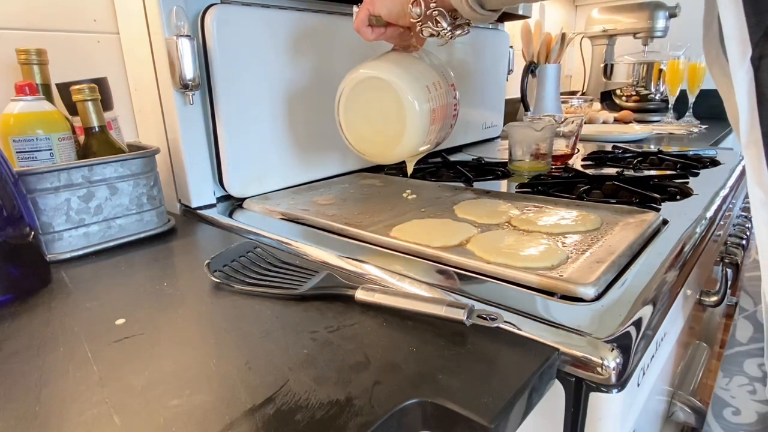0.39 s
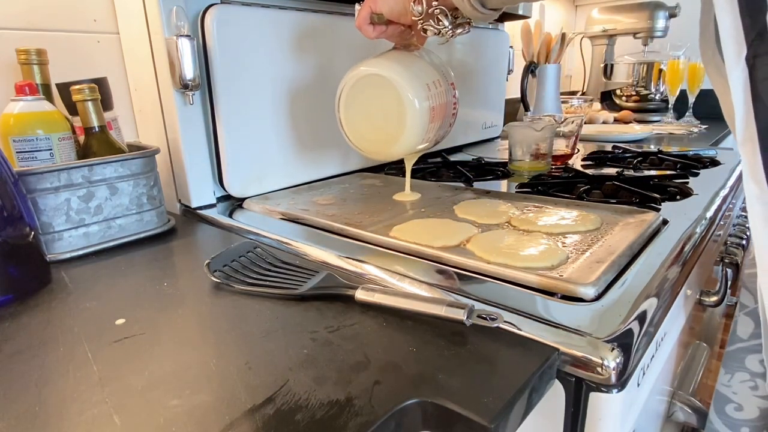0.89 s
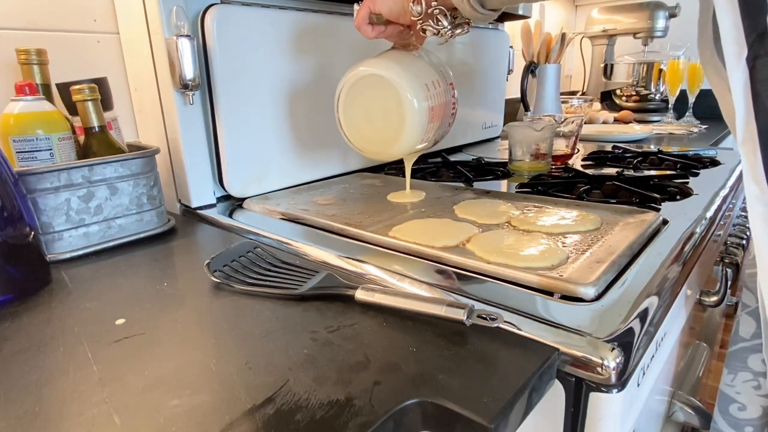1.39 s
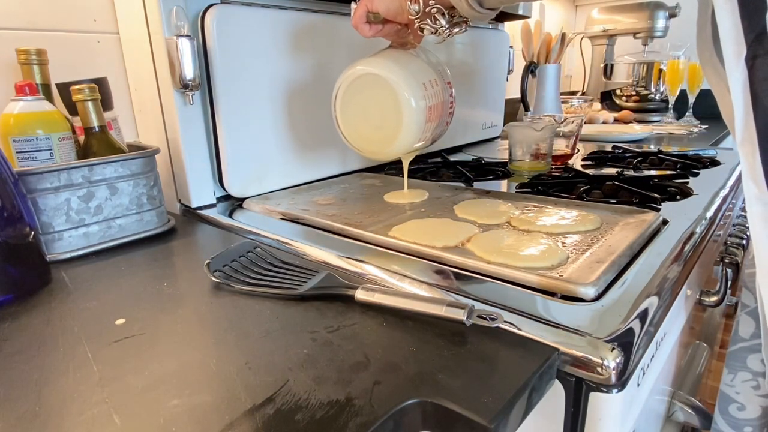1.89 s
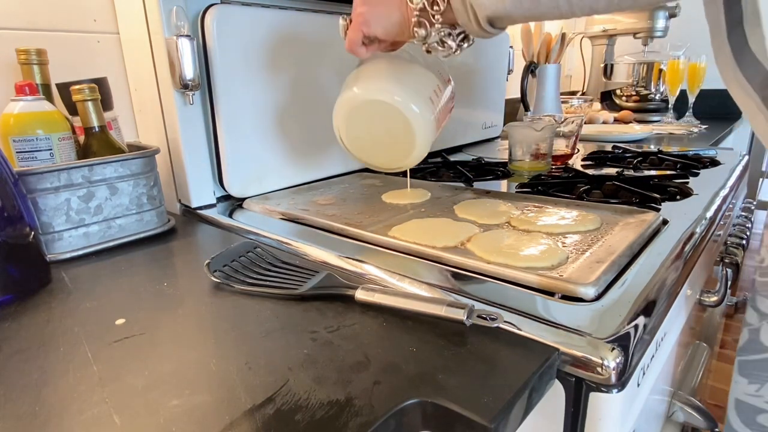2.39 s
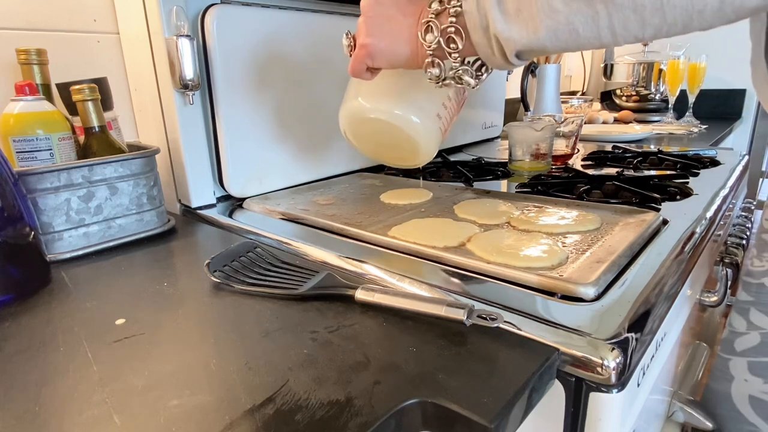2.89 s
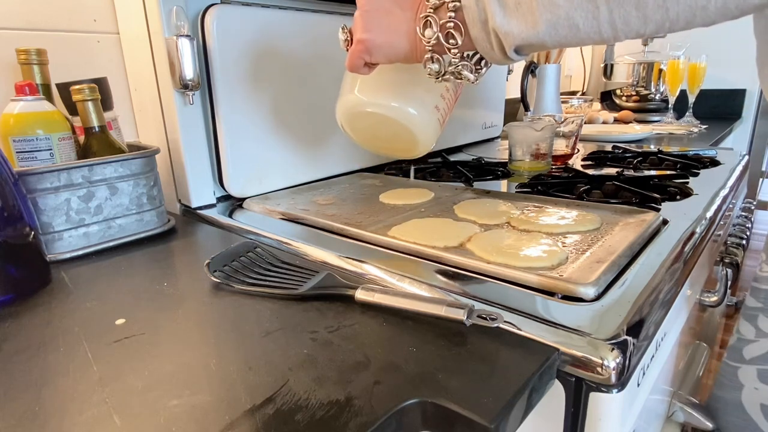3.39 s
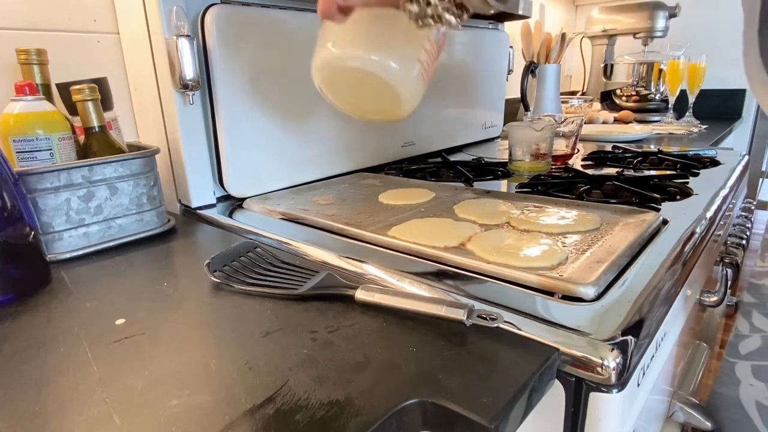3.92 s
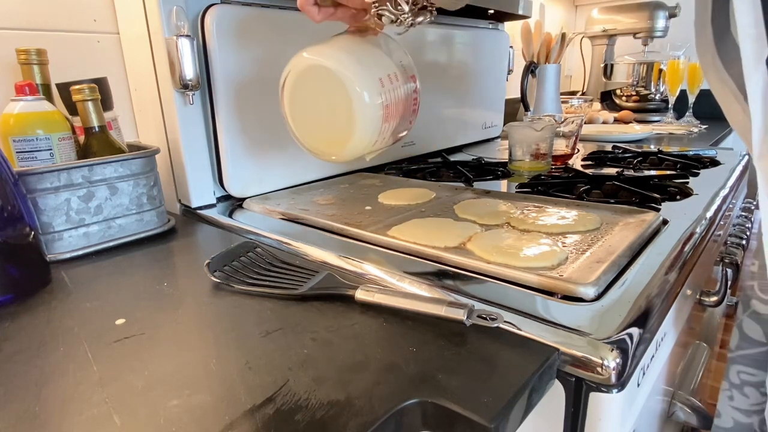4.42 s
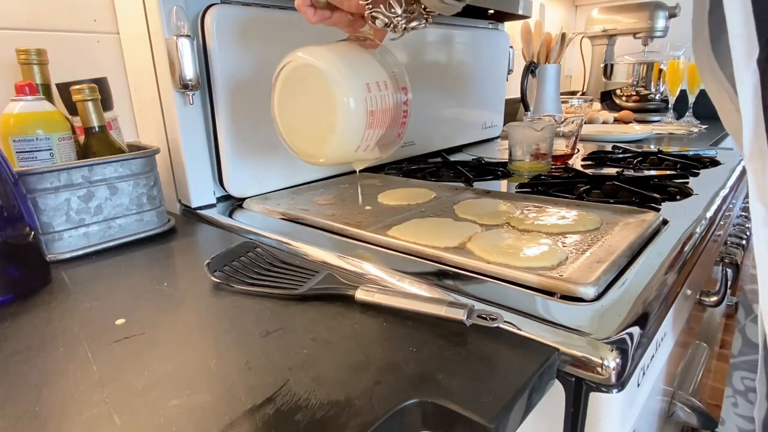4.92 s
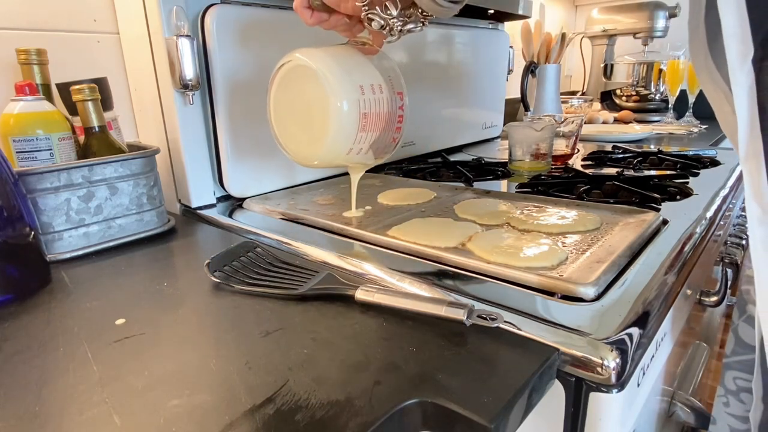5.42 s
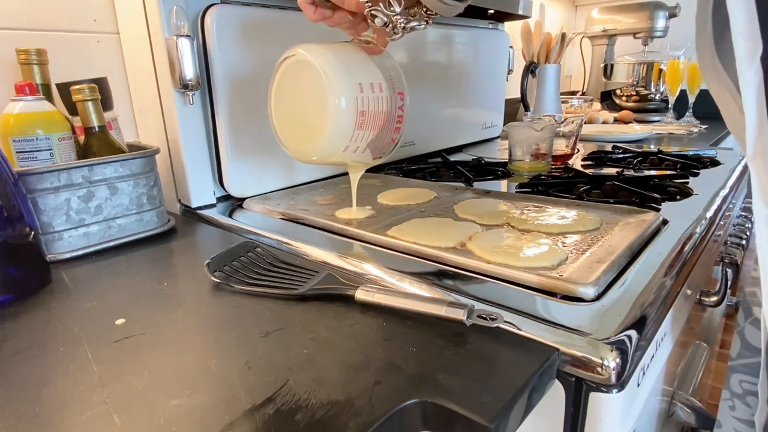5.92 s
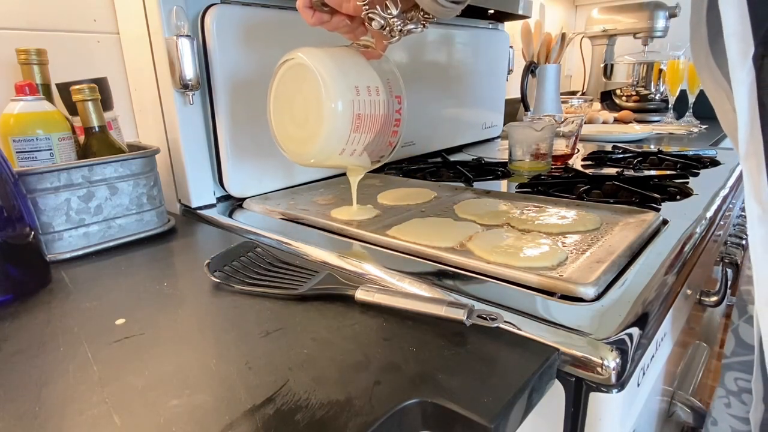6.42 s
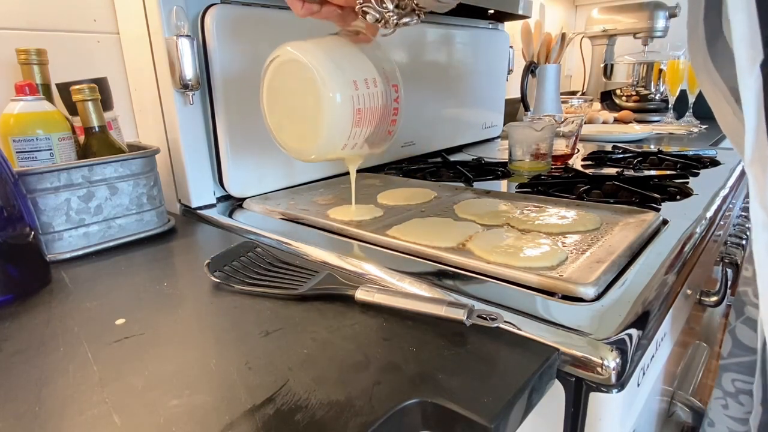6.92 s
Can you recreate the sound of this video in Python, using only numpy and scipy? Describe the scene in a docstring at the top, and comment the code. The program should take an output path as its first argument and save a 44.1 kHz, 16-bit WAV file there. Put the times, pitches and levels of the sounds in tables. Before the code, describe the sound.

A low, soft kitchen fan hum wavers throughout over a rush of air, beneath faint frying from earlier pancakes. In the first half second, tiny fat ticks and drips of batter make short sizzling bursts at about 0.25 and 0.35, with a faint plate ring. At 0.5 the first stream lands and the sizzle quickly swells to a dense, bright hiss with midrange bubbling beneath. It stays full until about 2.6, then fades gradually, thinning further around 4.5, while small sharp fat spits crackle, clustering between 3.7 and 4.5. Brief drip sizzles flare at 4.8 and 5.2, with tiny metallic tones. At 5.3 the second pour begins, slightly quieter but coarser and more spattery at first, dipping briefly near 6, then smoothing and easing into steady hiss until about 7. Close stereo pickup, wide and crisp, with little room echo.

```python
"""Batter sizzles as it is poured twice onto a hot greased griddle, heard by a pair of microphone ports.
Steam bubbles burst as thousands of random clicks, coloured by bubble size and by the ringing plate.
Fat spits in short cracks of noise, and the plate rings in brief soft tones near landing batter.
Behind them a kitchen fan hums: wavering tones over a rush of noise."""
import sys
import numpy as np
from scipy import signal
from scipy.fft import rfft, irfft, next_fast_len
from scipy.io import wavfile
from scipy.ndimage import uniform_filter1d

SR = 44100
rng = np.random.default_rng(int(sys.argv[2]) if len(sys.argv) > 2 else 0)


def int16_out(signal):
    """Quantize to a 16-bit WAV file."""
    q = np.round(np.clip(np.atleast_2d(signal).T, -1, 1) * 32767)
    wavfile.write(sys.argv[1], SR, q.astype(np.int16))


def attenuation_scalar(level_db):
    """Turn a level in dB into a linear amplitude multiplier (20 dB per decade)."""
    decades = np.asarray(level_db, float) / 20
    return 10 ** decades


N = 311346  # length [samples]
PADDED = next_fast_len(N, real=True)
HZ = np.fft.rfftfreq(PADDED, 1 / SR)
SIDE = np.array([[0.5], [-0.5]])  # splits a left-minus-right difference between the channels


def evened(x):
    """Scales to rms 1."""
    return x / np.sqrt(np.mean(x ** 2) + 1e-20)


def read(points, column=1):
    """Reads a spectrum table on a log-frequency axis."""
    rows = np.transpose(points)
    return np.interp(np.log(HZ + 1), np.log(rows[0] + 1), rows[column])


def bell(hz, width):
    """Resonance curve: 1 at its centre, one half at width / 2 to either side."""
    return 1 / (1 + ((HZ - hz) / (width / 2)) ** 2)


def hump(t, centre, length):
    """Smooth rise and fall around one moment, down to 1/e half a length away."""
    return np.exp(-(2 * (t - centre) / length) ** 2)


def wander(seconds):
    """Slow random drift of rms 1: noise smoothed twice over the given time."""
    span = max(round(seconds * SR), 1)
    once = uniform_filter1d(rng.standard_normal(N), span)
    return evened(uniform_filter1d(once, span))


def patchy(x, patch_db, ring_db):
    """Strengthens and weakens broad patches and narrow brief rings of the spectrum at random."""
    z = signal.stft(x, nperseg=1024, noverlap=768)[2]

    def drift(bins, frames):
        """Random map of rms 1, smoothed over frequency and time."""
        grain = rng.standard_normal(z.shape[1:])
        return evened(uniform_filter1d(uniform_filter1d(grain, bins, axis=0), frames, axis=1))

    gain_db = patch_db * drift(bins=14, frames=30) + ring_db * drift(bins=2, frames=16)
    return signal.istft(z * attenuation_scalar(gain_db), nperseg=1024, noverlap=768)[1][:, :N]


# likeness of the two channels by frequency:
# (frequency [Hz], power share common to both [0-1], phase by which right leads [rad])
CHANNEL_LIKENESS = [(30, 0.7, 1), (60, 0.43, 0.8), (253, 0.6, -0.9), (400, 0.4, -0.2), (520, 0.67, -1),
                    (610, 0.35, -1.2), (700, 0.08, 1.5), (800, 0.16, 0.5), (903, 0.5, -1),
                    (1020, 0.85, -1.77), (1100, 0.9, -1.67), (1166, 0.75, -1.7), (1260, 0.25, -1.3),
                    (1370, 0.6, -0.8), (1590, 0.2, 0.1), (1740, 0.45, 0.4), (1890, 0.5, -2),
                    (2110, 0.5, -0.8), (2250, 0.48, -1.5), (2500, 0.5, -1), (2790, 0.56, -1.54),
                    (2950, 0.58, -2.9), (3270, 0.49, -2.5), (3560, 0.4, -3), (4000, 0.12, 0),
                    (4880, 0.1, -2), (5050, 0.45, -4), (5430, 0.44, -5), (6840, 0.6, -7), (7500, 0.08, -12),
                    (7870, 0.1, -9.5), (8560, 0.46, -8), (9790, 0.3, -7), (9630, 1, -6.5),
                    (10300, 0.86, -6.0), (11200, 0.6, -4.5), (11850, 1, -3), (12540, 1, -2.5),
                    (12970, 0.8, -2), (13600, 1, 0), (15050, .7, 1.5), (15330, .94, 3.05), (16000, 1, 1)]
# nearby walls favour one port or the other: (frequency [Hz], left minus right [dB])
WALL_LEAN = [(200, -1), (400, -1.5), (620, 2), (760, -0.5), (940, -2.5), (1080, 2), (1200, -1.5), (1350, 4),
             (1520, -1.5), (1900, -3), (2100, -0.5), (2400, -1), (2800, -2), (3300, 1), (4500, 0),
             (6800, 0), (8400, 1), (9300, -0.5), (10000, -0.5)]
# the second puddle lies further along the plate: (frequency [Hz], extra phase by which right leads [rad])
SECOND_PUDDLE_LEAD = [(600, 0.8), (850, -0.4), (1050, -0.15), (1160, -0.95), (1290, -3), (1400, 1.1),
                      (1560, 1), (1730, 2.1), (1900, 0.1), (2070, -1.2), (2500, -.7), (2930, 0.9),
                      (3100, -0.1), (3450, 0.45), (4000, 0.061)]


def ports(common, left, right, colour, reach=1, moved=0):
    """Both channels share one sound, right leading in phase; the rest of each channel is its own."""
    share = np.clip(read(CHANNEL_LIKENESS), 0, 1) * reach
    lead = read(CHANNEL_LIKENESS, column=2) + moved * read(SECOND_PUDDLE_LEAD)
    shared = np.exp(-1j * lead * SIDE) * rfft(common, PADDED)
    own = rfft(np.array([left, right]), PADDED, axis=1)
    mixed = np.sqrt(share) * shared + np.sqrt(1 - share) * own
    return irfft(mixed * colour * attenuation_scalar(read(WALL_LEAN) * SIDE), PADDED, axis=1)[:, :N]


# wavering fan tones: (frequency [Hz], typical rms level [dB], rms pitch drift [Hz])
FAN_TONES = [(76.2, -82, 2.47), (114.5, -75.5, 1.8), (155.1, -76.5, 1.8), (238, -84.5, 4.98),
             (259, -87.5, 5.13), (386.5, -84.5, 5.95)]
# colour of the moving air: (frequency [Hz], relative level [dB per Hz])
AIR_COLOUR = [(20, -55), (30, -45), (38, -8), (50, 3), (100, 1), (250, 1), (310, -3), (500, -5.5),
              (900, -9), (2000, -7), (3300, -4), (8000, -12.5), (14000, -28)]


def fan():
    """Narrow wavering tones, the same at both ports, over a low rush of air."""
    common_reach = bell(0, 2 * 900)  # halves the common share by 900 Hz, so the treble is wider
    air = ports(*rng.standard_normal((3, N)), attenuation_scalar(read(AIR_COLOUR)), reach=common_reach)
    air = attenuation_scalar(-63 + 2.3 * wander(0.06)) * evened(patchy(air, patch_db=1.0, ring_db=0.68))
    t = np.arange(N) / SR
    hum = np.zeros(N)
    for hz, db, drift_hz in FAN_TONES:
        drift_cycles = np.cumsum(drift_hz * wander(0.0997)) / SR
        tone = np.sqrt(2) * np.sin(2 * np.pi * (hz * t + drift_cycles))
        hum += attenuation_scalar(db + 3.0 * wander(0.037)) * tone
    return air + hum


# short plate rings near landing batter:
# (time of peak [s], pitch [Hz], peak level midway between channels [dB], length [s], left minus right [dB])
PLATE_RINGS = [(0.37, 2080, -57, 0.076, -7), (5.272, 1960, -56, 0.066, -12), (5.276, 2400, -60, 0.075, -3),
               (5.52, 1690, -55, 0.075, 3)]


def plate_rings():
    """The plate rings near landing batter: a brief soft tone that swells and fades."""
    t, out = np.arange(N) / SR, np.zeros((2, N))
    for s, hz, db, length, lean_db in PLATE_RINGS:
        tone = hump(t, s, length) * np.sin(2 * np.pi * hz * t)
        out += attenuation_scalar(db + lean_db * SIDE) * tone
    return out


# single spits of fat: (time [s], relative peak level before colouring [dB])
FAT_SPITS = [(0.012, -38), (0.025, -39), (0.04, -38), (0.055, -42), (0.0688, -36), (0.1007, -43),
             (0.134, -44), (0.1431, -39), (0.2194, -43), (0.232, -36), (0.2468, -36), (0.263, -40),
             (0.3386, -38), (0.483, -29), (1.5174, -32), (1.6974, -28), (1.973, -25), (2.845, -31),
             (2.878, -26), (3.049, -31), (3.69, -32), (3.819, -33), (3.893, -33), (3.906, -33),
             (3.9535, -29), (4.081, -30), (4.099, -31), (4.156, -32), (4.1833, -31), (4.205, -32),
             (4.334, -31), (4.3094, -33), (4.4463, -27.5), (4.6644, -34), (4.8194, -36), (5.065, -35),
             (6.4785, -26.5)]


def spits():
    """Each spit is a bright crack of noise with a sharp first decay and a weaker tail of milliseconds."""
    length = 400  # samples
    t, common = np.arange(length) / SR, np.zeros(N + length)
    decay = np.exp(-t / 0.00058) + 0.23 * np.exp(-t / 0.0047)
    for s, db in FAT_SPITS:
        crack = rng.standard_normal(length) * decay
        common[round(s * SR):][:length] += attenuation_scalar(db) * crack / abs(crack).max() * 1.8
    common = common[:N]
    silence = np.zeros(N)  # neither channel has a part of its own
    colour = attenuation_scalar(read(FIZZ_COLOUR)) + 0.65 * attenuation_scalar(read(HISS_COLOUR))
    return ports(common, silence, silence, colour)


# streams of batter: (lands [s], stops [s], middle of rim drying [s], steam reference level [dB],
# coarseness before its share [dB])
BATTER_POURS = [(0.5, 2.62, 4.51, -44.5, -1), (5.31, 7.7, 6.87, -47.5, 5)]
# single blobs that land or flare: (time [s], steam reference level [dB], rise [s], fade [dB per s],
# coarseness before its share [dB])
BATTER_BLOBS = [(0.005, -59.5, 0.0046, 35, 3.5), (0.245, -52.5, 0.002, 57, -5.5),
                (0.326, -51, 0.013, 28, -4), (0.345, -47, 0.026, 12, 0), (4.797, -48, 0.025, 112, -5),
                (4.885, -58, .01, 150, -2), (5.02, -57, .015, 100, -2), (5.218, -48, 0.013, 12, 4),
                (5.65, -53, .02, 43, -1)]
# brief dips of the whole sizzle, a negative depth being a swell: (time [s], depth [dB], length [s])
SIZZLE_LULLS = [(0.205, 4, 0.037), (0.24, 4, 0.012), (4.605, 1, 0.072), (5.15, -0.6, .12),
                (5.886, 1.5, 0.025), (5.98, 2, 0.051)]
# The next tables give one value per bubble size: (gurgle, boil, hiss, fizz, spatter, crackle).
# older pancakes, always there: level [dB] of each
OLD_PANCAKES_DB = (-69, -68.5, -61.5, -59, -75, -72)
# offset from the steam reference level, for pours and for blobs: [dB] of each
POUR_OFFSET_DB = (-14, -7, 0.24, 0.37, -16.5, -19)
BLOB_OFFSET_DB = (-20, -16.5, 0.6, 0, -8.5, -16)
# growth time as the puddle spreads: [s] of each
SPREAD_S = (0.43, 0.1, 0.074, .12, 0.037, .3)
# loss from landing on, and further loss once the stream stops; negative grows: [dB per s] of each
SAG_RATE = (0.11, 0.96, 0.45, 0.07, 5, -3)
SET_RATE = (5, 1.6, 0.49, 1.03, 3, 2.9)
# step down as the rim dries: [dB] of each
RIM_DRY_DB = (0.26, 0.57, 2.5, 2.9, 0.98, 2.5)
# coarse boiling favours large bubbles over fine ones: share of coarseness [dB per dB] of each
COARSENESS_SHARE = (0.7, 0.89, -0.098, -0.49, 1.1, -0.3)


def steam(size):
    """Level of one bubble size: the powers of resting pancakes, streams and blobs add up."""
    t = np.arange(0, N, 32) / SR
    power = np.full(len(t), attenuation_scalar(OLD_PANCAKES_DB[size]) ** 2)
    for lands, stops, dries, db, coarse_db in BATTER_POURS:
        age = np.maximum(t - lands, 0)
        loss_db = SAG_RATE[size] * age
        loss_db = loss_db + SET_RATE[size] * np.maximum(t - stops, 0)
        loss_db = loss_db + RIM_DRY_DB[size] * (1 + np.tanh((t - dries) / 0.19)) / 2
        start_db = db + POUR_OFFSET_DB[size] + COARSENESS_SHARE[size] * coarse_db
        growth = 1 - np.exp(-age / SPREAD_S[size])
        power += (attenuation_scalar(start_db - loss_db) * growth) ** 2
    for s, db, rise, fade_db, coarse_db in BATTER_BLOBS:
        age = np.maximum(t - s, 0)
        start_db = db + BLOB_OFFSET_DB[size] + COARSENESS_SHARE[size] * coarse_db
        power += (attenuation_scalar(start_db - fade_db * age) * np.minimum(age / rise, 1)) ** 2
    lull_db = sum(db * hump(t, s, length) for s, db, length in SIZZLE_LULLS)
    return np.interp(np.arange(N) / SR, t, np.sqrt(power) * attenuation_scalar(-lull_db))


def bursts(per_s, spread_db, surge):
    """Three rows of clicks at random moments, most small and a few large, coming in surges."""
    size_db = spread_db * np.minimum(rng.exponential(1, (3, N)), 4)
    clicks = attenuation_scalar(size_db) * rng.standard_normal((3, N))
    clicks = clicks * (rng.random((3, N)) < per_s / SR)
    return np.array([evened(row) * surge for row in clicks])


# colour of each bubble size, from large to fine: (frequency [Hz], relative level [dB per Hz])
GURGLE_COLOUR = [(250, -24), (400, -9.5), (550, -6.5), (650, -7.5), (800, -2.5), (950, 1.5), (1200, -13),
                 (2000, -37)]
BOIL_COLOUR = [(600, -22), (950, -7), (1040, -2.5), (1100, 0), (1350, -2), (1550, 0), (1720, -1),
               (1850, -4), (2200, -4), (2600, -6), (3600, -4.5), (5500, -62)]
HISS_COLOUR = [(1200, -25.5), (2200, -5.5), (3100, -4.5), (3700, -2), (4300, -1.5), (5000, -0.5),
               (6300, -1.5), (7300, -3), (8200, -5.5), (9500, -5), (12000, -16)]
FIZZ_COLOUR = [(6000, -22.5), (8200, -8), (9200, -1.5), (10500, 1.5), (11600, 2), (12300, -1.5),
               (13100, -0.5), (14000, 0), (15000, 0.5), (16000, -14)]
# mid-sized bubbles under a small fresh puddle: (frequency [Hz], relative level [dB per Hz])
SPATTER_COLOUR = [(900, -25), (1150, -6), (1280, 1), (1650, -1.5), (2000, -5), (2500, -0.5), (2900, -15),
                  (4000, -30)]
# griddle plate resonances:
# (frequency [Hz], width [Hz], boost before the ringing factor [dB], left minus right before it [dB])
PLATE_MODES = [(500, 40, 3, -2), (535, 40, 2, 1), (678, 25, 4, 3), (775, 45, 4, 2), (930, 60, 2, -1),
               (1086, 45, 6, 0), (1160, 55, 4, 3), (1265, 55, 4, 5), (1430, 40, 1, 3), (1635, 20, 2, 3),
               (1688, 30, 5, 3), (1964, 25, 5, -3), (2010, 30, 2, 4), (2080, 40, 2, -1), (2449, 50, 2.5, 0),
               (3280, 80, 1.5, 1), (3430, 40, 1.5, -2), (3950, 120, 1.5, -1), (4590, 100, 2, -1),
               (5080, 150, 1.5, 2), (6300, 200, 1, 0)]
# how strongly the plate rings: (factor on dB under first puddle, factor on dB under second puddle)
PLATE_RINGING = (1, 1.11)


def sizzle():
    """Five sizes of bursting bubble and stray pops, all surging together a little and each on its own."""
    common_db = 0.5 * wander(0.02) + 0.43 * wander(0.0045) + 0.55 * wander(0.0014)
    plate = attenuation_scalar(sum((db + lean_db * SIDE) * bell(hz, width) for hz, width, db, lean_db in PLATE_MODES))
    second = np.arange(N) > 5.21 * SR  # from 5.21 s the bubbles burst at the second puddle

    def layer(colour, per_s, spread_db, common, own_db, patch_db, ring_db):
        """One bubble size: clicks coloured by the bubble and the plate, at the place of each puddle."""
        surge = attenuation_scalar(common * common_db + own_db * wander(0.038))
        clicks = bursts(per_s, spread_db, surge)
        heard = 0
        for puddle in range(2):
            tone = attenuation_scalar(read(colour)) * plate ** PLATE_RINGING[puddle]
            heard = heard + ports(*(clicks * (second == puddle)), tone, moved=puddle)
        return evened(patchy(heard, patch_db, ring_db))

    # stray sharp pops, growing while the stream runs, then steady until the rim dries
    crackle_colour = HISS_COLOUR[:-2] + FIZZ_COLOUR[2:]
    return (steam(size=0) * layer(GURGLE_COLOUR, 4000, 1.0, 0.28, 0.83, 1.0, 1.9)
            + steam(size=1) * layer(BOIL_COLOUR, 6000, 1.25, 0.41, 0.1, 0.71, 0.87)
            + steam(size=2) * layer(HISS_COLOUR, 15000, 1.25, 0.69, 0.33, 0.31, 1.73)
            + steam(size=3) * layer(FIZZ_COLOUR, 12000, 0.93, 0.84, 0.3, 0.88, 2.1)
            + steam(size=4) * layer(SPATTER_COLOUR, 5000, 0.72, 0.45, 0.4, 0.52, 3.7)
            + steam(size=5) * layer(crackle_colour, 400, 1.6, 0.3, 0.3, 0.3, 0.3))


def scene():
    """Fan, plate rings and spits around the sizzling batter."""
    return fan() + plate_rings() + spits() + sizzle()


def roll_off(x):
    """The treble ends steeply here."""
    return signal.sosfilt(signal.butter(12, 16160, fs=SR, output="sos"), x)


def record(dry):
    """Limits the band with a steep slope, 60 Hz wide, around 15.8 kHz."""
    slope = np.clip((15800 - HZ) / 60 + 0.5, 0, 1)
    limited = irfft(rfft(dry, PADDED, axis=1) * slope, PADDED, axis=1)[:, :N]
    return roll_off(limited)


dry = scene()
out = record(dry)
int16_out(out)
```